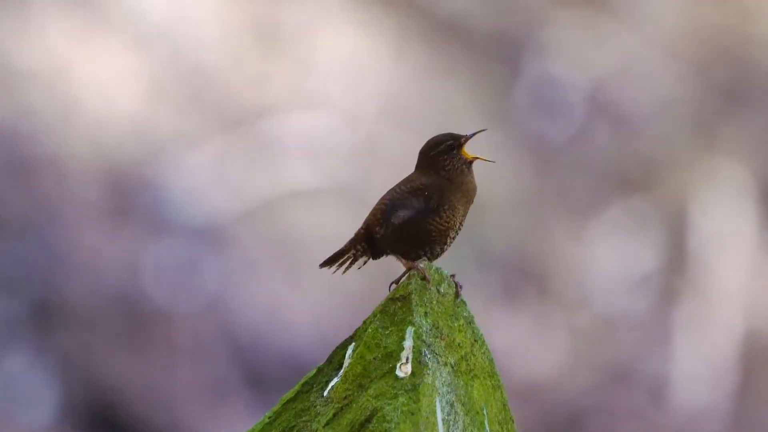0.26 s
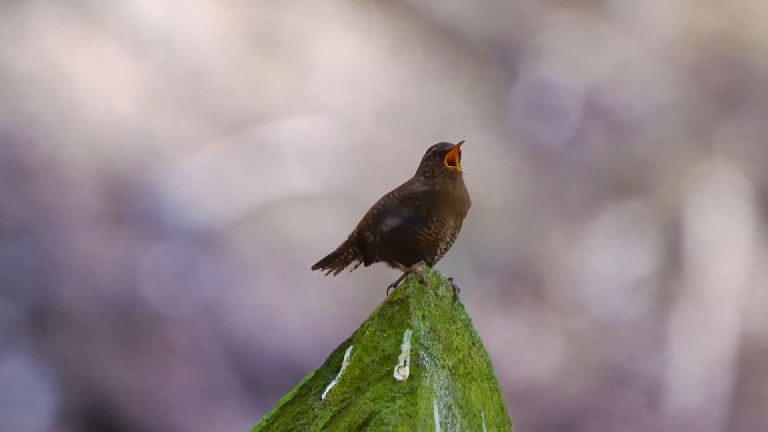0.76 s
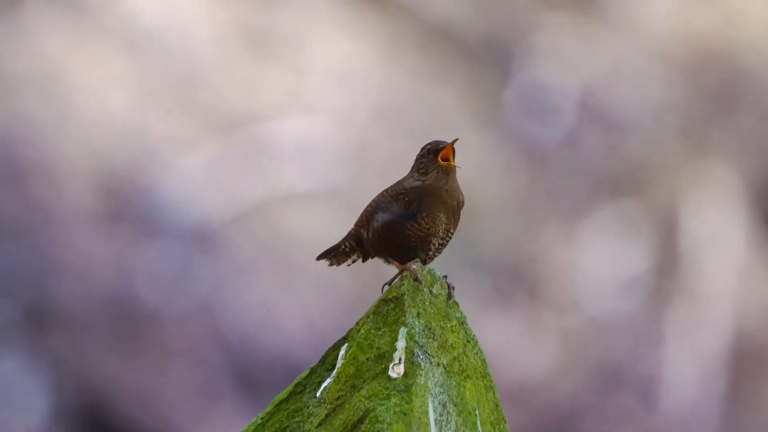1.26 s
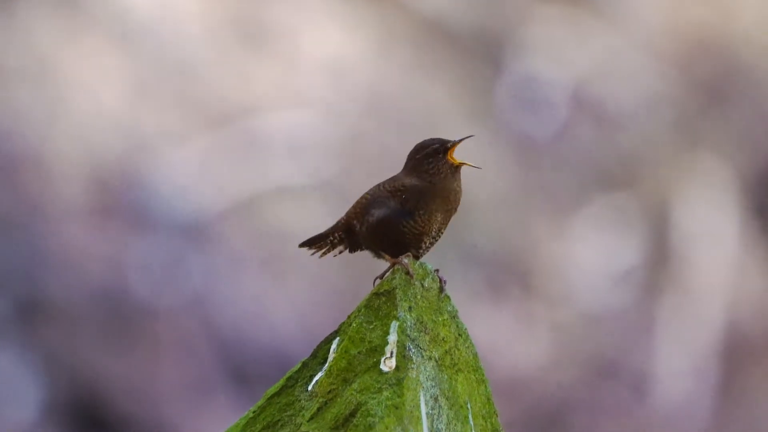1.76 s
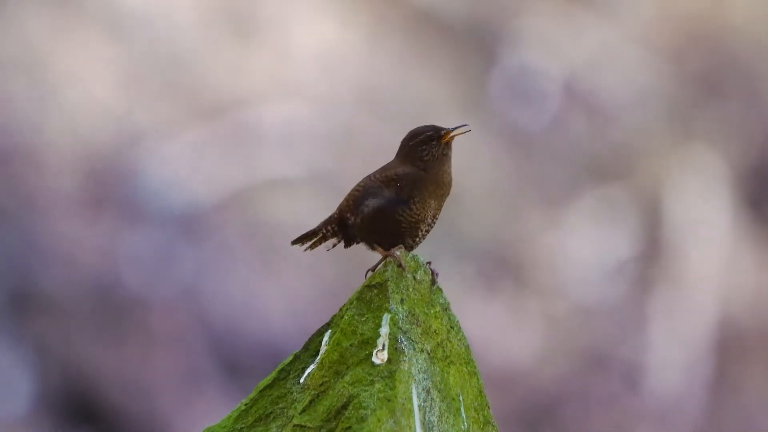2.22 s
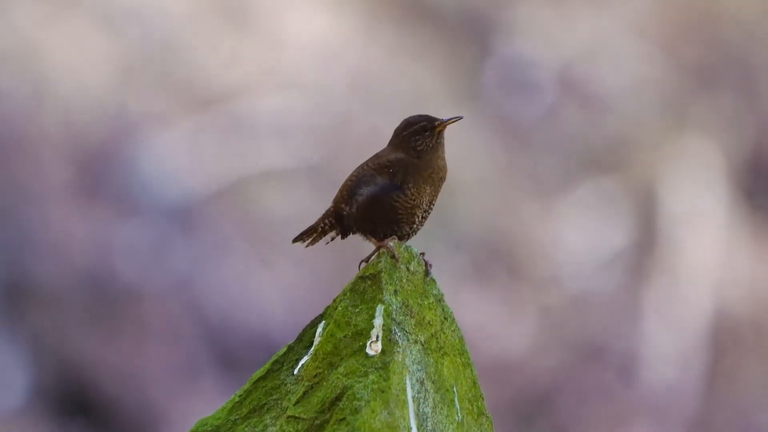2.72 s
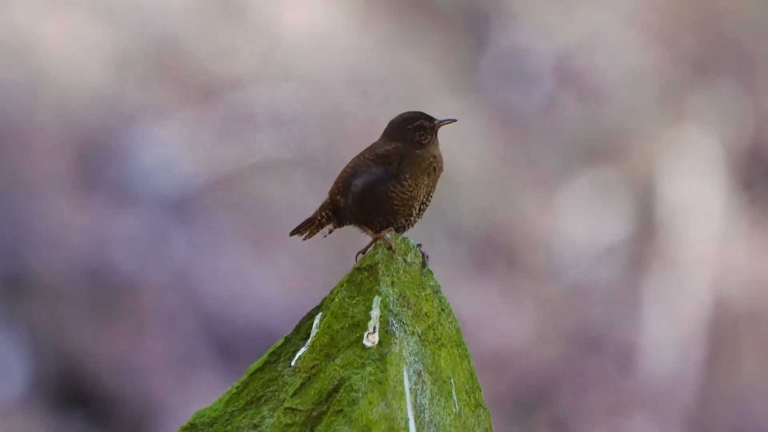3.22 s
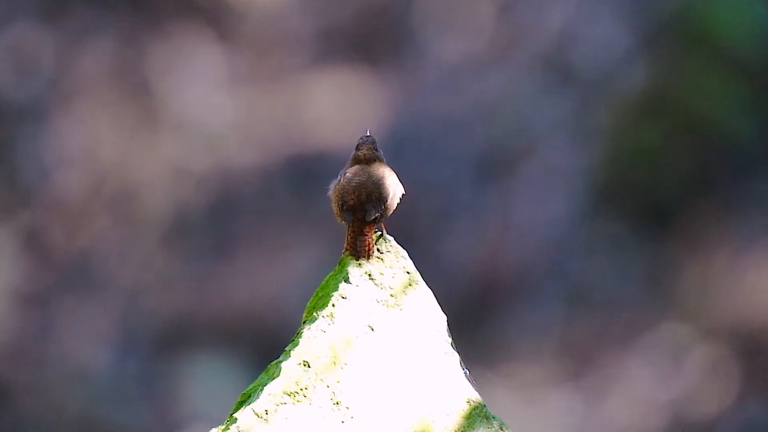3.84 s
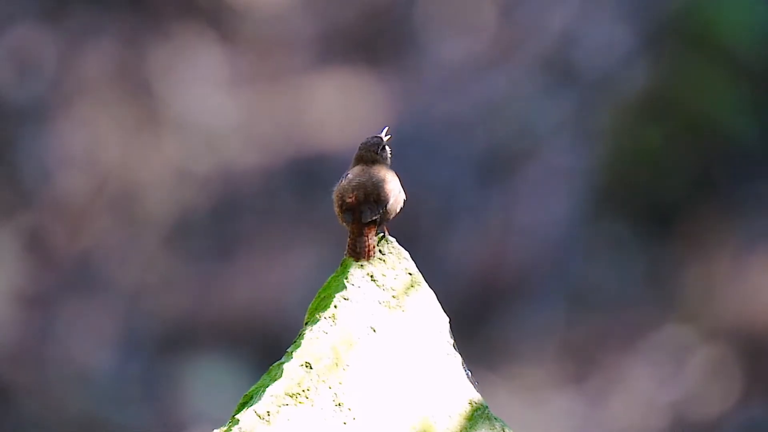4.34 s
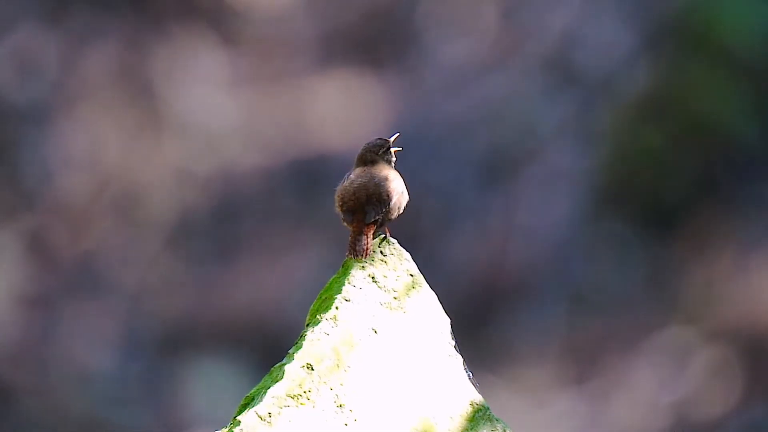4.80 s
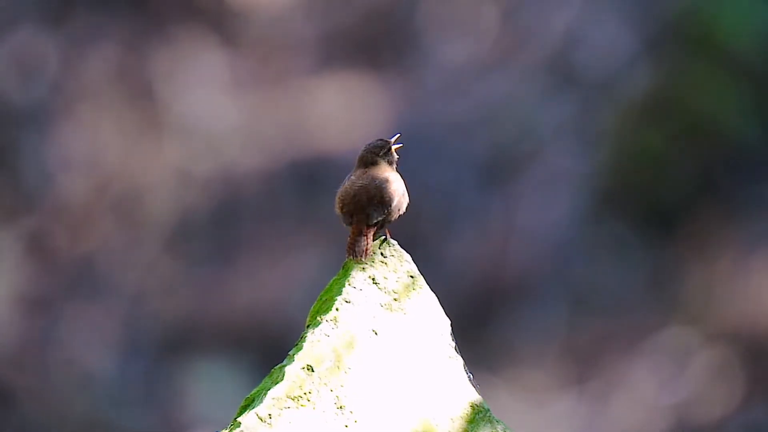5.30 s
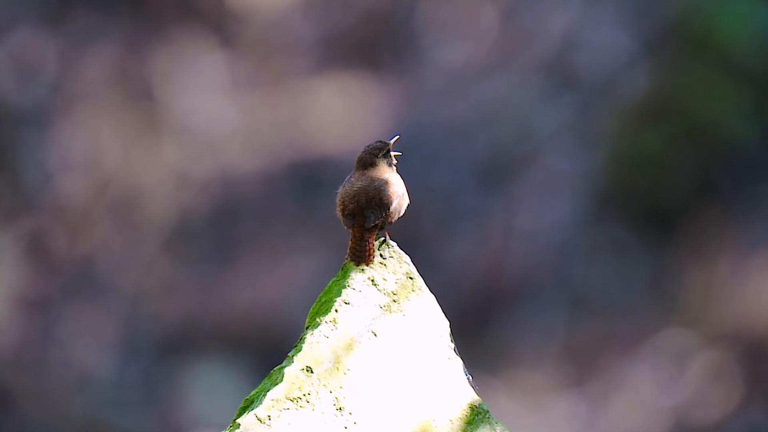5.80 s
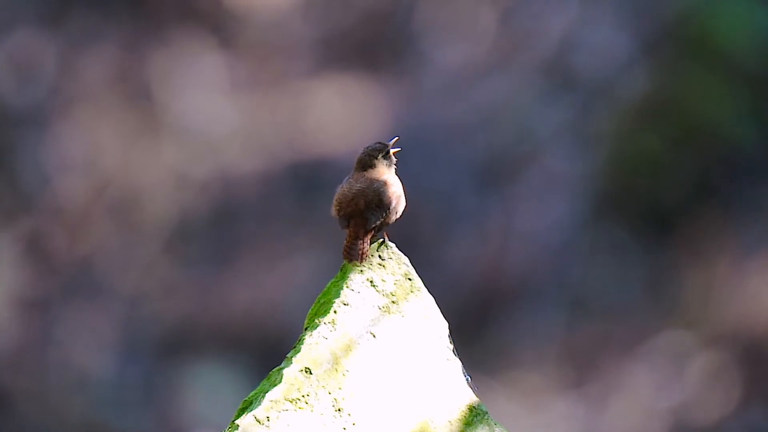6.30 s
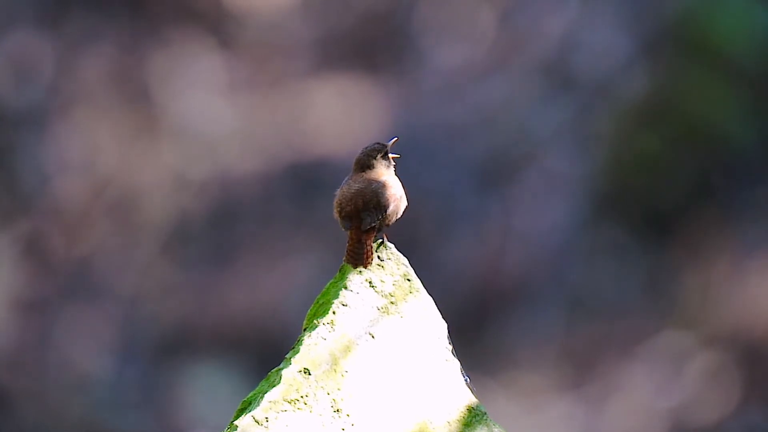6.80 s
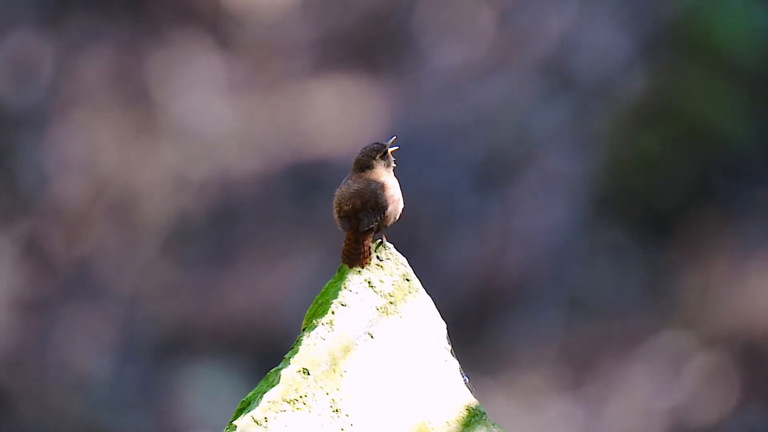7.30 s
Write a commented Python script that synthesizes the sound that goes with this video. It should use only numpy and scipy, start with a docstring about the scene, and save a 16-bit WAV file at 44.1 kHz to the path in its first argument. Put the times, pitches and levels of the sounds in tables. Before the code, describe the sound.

Outdoors by a rushing stream, a small wren sings loudly and close, its pure high whistles bending, warbling and trilling. Other wrens overlap it, one deeper in the wood and softer. Clear short echoes return from left and right. A fast chipping trill fills about a second near two seconds, then sharp swooping notes and twitters follow. The water hisses evenly throughout, with a few faint ticks.

```python
"""Three wrens by a rushing stream

Three wrens sing over each other as pure sine whistles that glide, hook, warble and trill.
One sits straight ahead; a rock face on the left and a farther one on the right throw the second's
notes back; a third, deeper in the wood, has softer echoes. The stream is shaped, partly shared noise
with almost no bass, and a few faint ticks are short smooth pulses."""
import sys
import numpy as np
from scipy import signal
from scipy.fft import rfft, irfft, next_fast_len
from scipy.io import wavfile
from scipy.ndimage import uniform_filter1d, map_coordinates

SR = 44100
rng = np.random.default_rng(int(sys.argv[2]) if len(sys.argv) > 2 else 0)


def pcm_store(signal):
    """Save signal as 16-bit PCM."""
    levels = np.round(np.clip(np.atleast_2d(signal), -1, 1) * 32767)
    wavfile.write(sys.argv[1], SR, levels.astype(np.int16).T)


N = 332955

SWELL_CURVE = 1.4  # power of the distance from a note's peak while it swells


def amp(db):
    """Gain of a level in dB."""
    return 10 ** (np.asarray(db) / 20)


def unit(x):
    """x scaled to an RMS of 1."""
    return x / np.sqrt(np.mean(x ** 2) + 1e-20)


def along(points, hz):
    """A response through (f/Hz, value) points, interpolated on a log frequency axis."""
    f, value = np.transpose(points)
    return np.interp(np.log(hz + 1), np.log(f + 1), value)


def wobble(rate):
    """A smooth random curve through rate knots a second."""
    knots = rng.standard_normal(int(N * rate / SR) + 4)
    return map_coordinates(knots, [np.arange(N) * rate / SR])


def filtered(x, response):
    """x with its spectrum multiplied by a response of frequency."""
    m = next_fast_len(N + SR // 2)
    spectrum = rfft(x, m) * response(np.fft.rfftfreq(m, 1 / SR))
    return irfft(spectrum, m)[..., :N]


def convolved(x, h):
    """x through one impulse response per side."""
    return signal.fftconvolve(np.atleast_2d(x), h, axes=1)[:, :N]


def add(track, start, sound):
    """Mix a sound into a track from sample start on."""
    first = max(start, 0)
    piece = sound[first - start:N - start]
    track[first:first + len(piece)] += piece


def tail(t60, gap):
    """Scattered reflections: two unrelated noise decays of about unit energy that begin after a gap."""
    t = np.arange(SR // 2) / SR
    h = rng.standard_normal((2, len(t))) * amp(-60 * t / t60) * (t > gap)
    return h / np.linalg.norm(h[0])


def rough_face(t60, smear_db):
    """A rough reflector returns one clear copy followed by a short smear."""
    face = amp(smear_db) * tail(t60, 0)
    face[:, 0] = 1
    return face


def whistle(rows, phase, fade=.004):
    """The syrinx makes one pure tone along (t/s, f/Hz, level/dB); returns its first sample and the sound."""
    s, hz, db = np.transpose(rows)
    t = np.arange(s[0] - fade, s[-1] + fade, 1 / SR)
    round_off = int(.003 * SR) + 1  # muscles round the corners of a glide
    pitch = uniform_filter1d(np.interp(t, s, hz), round_off, mode="nearest")
    level = uniform_filter1d(np.interp(t, s, db), round_off, mode="nearest")
    edge = np.clip(np.minimum(t - t[0], t[-1] - t) / (2 * fade), 0, 1)
    envelope = amp(level) * np.sin(edge * np.pi / 2) ** 2
    tone = np.sin(phase + 2 * np.pi * np.cumsum(pitch) / SR)
    return round(t[0] * SR), envelope * tone


def sing(notes):
    """All given notes of one bird in one track; moving air makes the level flutter."""
    out = np.zeros(N)
    for rows, phase in zip(notes, 2 * np.pi * rng.random(len(notes))):
        add(out, *whistle(rows, phase))
    return out * amp(1.5 * wobble(90))


def placed(shape, events):
    """One note per event (t/s, level/dB, f/Hz): the same shape shifted in time, pitch and level."""
    return [np.array(shape) + [s, hz, db] for s, db, hz in events]


def glides(notes, later=0):
    """Single notes: the pitch bends as a parabola through three values, the level swells and fades."""
    fade_curve = 0.96  # power of the distance from the peak
    out = []
    for start, length, first, middle, last, db, place, swell_db, fade_db in notes:
        u = np.linspace(0, 1, num=25)  # share of the note gone by
        place = np.clip(place, .01, .99)
        hz = first * (1 - u) * (1 - 2 * u) + 4 * middle * u * (1 - u) + last * u * (2 * u - 1)
        before = np.clip(1 - u / place, 0, 1)
        after = np.clip((u - place) / (1 - place), 0, 1)
        level = db - swell_db * before ** SWELL_CURVE - fade_db * after ** fade_curve
        out.append(np.transpose([later + start + length * u, hz, level]))
    return out


def arches():
    """Notes that climb to a top over a length of their own, then all plunge alike."""
    # rise to the top [share of the climb still to go, f/Hz, level/dB]
    climb_shape = [(0.99, 6880, -18), (0.4, 7350, -13)]
    # fall from the top [t from the event/s, f/Hz, level/dB]
    plunge = [(-.062, 7740, -16.5), (-.052, 7740, -18.5), (-.033, 6820, -14), (0, 5370, -1.5),
              (.014, 4730, -16)]
    # arched notes [t/s, level/dB, climb length/s]
    arch_events = [(2.472, -5.5, .014), (2.695, -5, 0.093), (2.925, -5, .096), (3.153, -5.5, 0.088)]
    top = plunge[0][0]
    out = []
    for s, db, length in arch_events:
        climb = [(top - left * length, hz, level) for left, hz, level in climb_shape]
        out.append(np.array([*climb, *plunge]) + [s, 0, db])
    return out


def shoulders():
    """Notes that hold their pitch, then roll off down as much of one slope as they last."""
    # held notes [t of the bend/s, peak level/dB, held f/Hz, hold/s, fall/s]
    held = [(1.811, -10, 5896, 0.024, 0.064), (5.292, -6.5, 5790, 0.025, 0.049),
            (5.937, -9.5, 5810, .048, 0.032)]
    roll_hz, roll_s = 1510, .06  # depth and length of the whole slope
    peak_s, swell_db, fade_db_per_s = .014, 14, 160  # loudest just after the bend
    out = []
    for bend, db, hz, hold, fall in held:
        t = np.linspace(-hold, fall, num=25)
        pitch = hz - roll_hz * np.sin(np.pi / 2 * np.clip(t / roll_s, 0, 1)) ** 2
        early = np.clip((peak_s - t) / (peak_s + hold), 0, 1)
        level = db - swell_db * early ** SWELL_CURVE - fade_db_per_s * np.clip(t - peak_s, 0, 1)
        out.append(np.transpose([bend + t, pitch, level]))
    return out


def stream(patchy_db=1.1):
    """Rushing water: noise partly shared by both sides, with faint patches in time and pitch."""
    # colour of the water, relative [f/Hz, level per Hz/dB]
    colour = [(180, -106), (300, -62), (580, -58), (756, -48), (877, -48), (968, -42), (1240, -38.5),
              (2000, -18), (3510, -5.5), (4200, 0), (4880, -1), (8410, -6), (11500, -12.5), (15500, -21.5)]
    # likeness of left and right [f/Hz, correlation]
    alike = [(600, 0.68), (1500, 1), (3000, 0.74), (6000, 0.13), (12000, 0.18)]
    # balance of the sides [f/Hz, left minus right level/dB]
    lean = [(500, 2), (1500, 0.5), (8000, -0.5), (12000, -2)]
    z = signal.stft(rng.standard_normal((2, N)), nperseg=512)[2]
    field = uniform_filter1d(uniform_filter1d(rng.standard_normal(z.shape[1:]), 6, 0), 10, 1)
    pair = signal.istft(z * amp(patchy_db * unit(field)), nperseg=512)[1][:, :N]

    def mid_side(hz):
        turn = np.arccos(np.clip(along(alike, hz), -1, 1)) / 2  # shares power between mid and side
        return amp(along(colour, hz)) * [np.cos(turn), np.sin(turn)]

    mid, side = filtered(pair, mid_side)
    both = filtered(np.array([mid + side, mid - side]),
                    lambda hz: amp(np.outer([.5, -.5], along(lean, hz))))
    return amp(-27) * unit(both)  # RMS over both sides, dB


def ticks():
    """Single dull clicks: smooth pulses of a few samples, a little louder on the left."""
    # clicks [t/s, level before the lift/dB]
    clicks = [(.083, -37.5), (1.917, -41), (2.699, -46), (3.218, -48), (3.471, -46), (3.712, -60),
              (4.648, -35.5), (6.013, -42.5), (7.379, -30.5)]
    lift_db = 12
    out = np.zeros(N)
    for s, db in clicks:
        add(out, round(s * SR), amp(db + lift_db) * np.hanning(9))
    return out * amp([[1.2], [-1.2]])


def back_wren():
    """Ahead but deeper in the wood: two softer, blurred echoes and a tail."""
    # single notes [t/s, length/s, first f/Hz, middle f/Hz, last f/Hz, peak level/dB,
    # place of peak 0-1, swell/dB, fade/dB]
    notes = [ (.58, .025, 7750, 7675, 7600, -30, 1, 1, 0),
             (.632, .073, 7300, 7160, 7130, -18.5, 0.041, 0, 13),
             (1.315, 0.08, 5750, 5650, 5800, -19, .47, 12, 11),
             (5.285, 0.028, 4150, 4200, 4130, -23.5, 0, 0, 8),
             (5.9, 0.015, 5420, 5300, 5400, -16, 0.45, 7, 7),
             (6.488, 0.052, 5300, 4960, 4910, -12, 0.54, 4, 6),
             (6.574, .05, 4910, 4020, 3260, -13.5, 0.48, 19, 14),
             (6.675, 0.053, 3400, 3830, 4280, -13, 0.96, 18, 16),
             (6.684, 0.07, 5680, 5620, 5890, -20.5, 0.57, 5, 6),
             (6.752, 0.041, 4330, 3620, 3300, -12, 0.017, 3, 20),
             (6.842, 0.053, 3200, 3724, 4250, -15.5, 1, 12, 0),
             (6.921, 0.031, 4220, 3570, 3190, -15, 0, -6, 12)]
    # down-and-up warble [t from lowest point/s, f above lowest/Hz, level/dB]
    vee = [(-.022, 691, -14), (-.01, 332, -2.5), (0, 1, -5), (.012, 476, -2), (0.025, 954, -9.5)]
    # shapes of a pip and a dipping note [t from the event/s, f from its pitch/Hz, level/dB]
    pip = [(-.01, 150, -6.5), (0, 6, 0.5), (.009, -320, -15)]
    dip = [(-.068, 420, -11), (-.02, 199, -2), (0, 0, -2), (.023, 230, -1.5)]
    # when each shape is sung [t/s, level/dB, f/Hz]
    vees = [(5.989, -18, 5340), (6.075, -16, 5400), (6.156, -16.5, 5220), (6.24, -14.5, 5220),
            (6.326, -14, 5160), (6.41, -18, 5420)]
    pips = [(5.714, -10.5, 4500), (5.775, -14.5, 4350), (5.834, -14, 4220)]
    dips = [(.21, -18.5, 7000), (.36, -20.5, 7060), (.52, -20.5, 7080)]
    # echoes [delay/s, left level/dB, right level/dB]
    echoes = [(.091, -10, -15), (.146, -18, -12.5)]
    song = sing([*glides(notes), *placed(vee, vees), *placed(pip, pips), *placed(dip, dips)])
    out = song + amp(-6) * convolved(song, tail(0.61, .005))
    for delay, *sides_db in echoes:
        late = np.pad(song, (round(delay * SR), 0))
        out += amp(sides_db)[:, None] * convolved(late, rough_face(0.03, 0))
    return out


def rock_wren():
    """Among the rocks: close leaves blur the song, each rough face returns a clear copy and a smear."""
    # single notes, then a refrain sung twice [t/s, length/s, first f/Hz, middle f/Hz, last f/Hz,
    # peak level/dB, place of peak 0-1, swell/dB, fade/dB]
    notes = [ (.001, .055, 7120, 7280, 7220, -22, 0.12, -6.5, 5),
             (.006, 0.0394, 5750, 5230, 4910, -9, 0.47, 7.5, 7),
             (.031, 0.055, 4300, 4254, 4085, -10.5, 0.49, 9, 3.5),
             (.088, 0.015, 4370, 4130, 3900, -16, 0, -6, 5),
             (1.176, 0.1, 4020, 4610, 5870, -13.5, 0.41, 16, 2.5),
             (1.332, 0.046, 6000, 4520, 3920, -15.5, 0.58, 1, 4.5),
             (1.49, 0.098, 7130, 7080, 6990, -23.5, 0.98, 6, 3),
             (1.64, 0.11, 7520, 7180, 7200, -19.5, .4, 2, 3),
             (3.238, 0.066, 4350, 4400, 4400, -11, 0.75, 3, 3),
             (3.31, 0.024, 4330, 4360, 4340, -21.5, 1, 1, 0),
             (3.352, 0.065, 6410, 6500, 5940, -10.5, 0.45, 13, 2),
             (3.49, 0.022, 4850, 4370, 4140, -16.5, .42, 11.5, 2),
             (3.7, 0.048, 6680, 4750, 3970, -10.5, 0.31, 10.5, 8),
             (3.814, 0.11, 6650, 6440, 6650, -13, 0.62, 6.5, 4),
             (3.998, 0.096, 8000, 7790, 7800, -17.5, 0.56, 11, 3),
             (4.128, 0.083, 6680, 6080, 6200, -15, 0.49, 2.5, 15),
             (4.22, .041, 6600, 4910, 4820, -13.5, 0.38, 2, 1.5),
             (4.852, 0.087, 4326, 4228, 4074, -10.5, 0.72, 9.5, 15),
             (5.003, .03, 8970, 8060, 7670, -24, 1, 9, 0),
             (5.03, 0.18, 7720, 7910, 8060, -20.5, 0.19, -1, 0.5),
             (5.409, 0.039, 3880, 3780, 3700, -20, 0, 0, 8),
             (5.496, 0.062, 5616, 5310, 4320, -9, .16, 11, 3),
             (5.595, 0.075, 5480, 5374, 5200, -9, 0.56, 22, 2.5),
             (6.026, .039, 3750, 3757, 3530, -22.5, .4, 8, 8),
             (6.147, 0.17, 7620, 7305, 7190, -15, 0.3, 12, 8.5),
             (6.34, 0.038, 5650, 5200, 4650, -6, 0.52, 10.5, 23),
             (6.39, .016, 4470, 4215, 4000, -17, 0, 0, 2), (6.434, 0.023, 4320, 4110, 4050, -16, .4, 2, 7),
             (7.03, 0.13, 7200, 6380, 6320, -17, 0.89, 8, 4),
             (7.512, .038, 7515, 6500, 5460, -14.5, 1, 16, -17)]
    refrain = [ (.685, .081, 5540, 5134, 4610, -6.5, 0.34, 16, 11.2),
               (.805, .023, 4360, 4215, 4100, -14, 0.095, 9, 10.5),
               (.851, 0.017, 4380, 4160, 3910, -12.5, .45, 12, 10),
               (.925, 0.1, 7470, 7620, 7560, -16, 0.86, 9, 9),
               (1.058, 0.046, 6080, 4570, 3850, -11, 0.47, 5, 8)]
    refrain_again_s = 6.352
    # down-and-up warble [t from lowest point/s, f above lowest/Hz, level/dB]
    vee = [(-.022, 691, -14), (-.01, 332, -2.5), (0, 1, -5), (.012, 476, -2), (0.025, 954, -9.5)]
    # shapes of a scoop, upturn, flick and slide [t from the event/s, f from its pitch/Hz, level/dB]
    scoop = [(-.049, -130, -8), (-.02, -150, -1), (0, 0, 0), (.015, 402, -2), (.048, 1690, -2),
             (.056, 1750, -16)]
    upturn = [(-.058, -80, -3.5), (-.03, -92, -1), (0, 5, 0), (.012, 320, -1)]
    flick = [(-.016, -640, -14.5), (0, 0, -1.5), (.01, 230, -10)]
    slide = [(-.046, 1402, -10), (-.038, 780, -7), (-.03, 660, -8), (-.023, 500, -16), (-.014, 220, -7.5),
             (0, -5, 0.5), (.016, -20, -5.5)]
    # when each shape is sung [t/s, level/dB, f/Hz]
    vees = [(.278, -12.5, 6220), (.358, -14, 6240), (.44, -11, 6300), (.522, -11.5, 6310),
            (.608, -11.5, 6310), (6.627, -12.5, 6180), (6.711, -13.5, 6240), (6.794, -13, 6270),
            (6.876, -11.5, 6300), (6.961, -10.5, 6260)]
    scoops = [(3.605, -9.5, 4520)]
    upturns = [(.203, -14, 6190), (6.555, -15, 6180)]
    flicks = [(4.316, -10, 5480), (4.449, -9, 5340), (4.582, -6, 5490), (4.717, -6, 5350)]
    slides = [(4.378, -15.5, 6120), (4.516, -13.5, 6120), (4.646, -13.5, 6120), (4.776, -12, 6080)]
    # slowly drifting echo paths [t/s, left rock delay/s, right rock delay/s]
    echo_paths = [(0, 0.066, .097), (0.697, 0.08, 0.11), (1.4, 0.083, 0.12), (2.5, 0.084, 0.13),
                  (3.2, 0.085, 0.13), (4.4, 0.081, 0.13), (4.8, .08, .129), (5.4, 0.08, 0.13),
                  (6.4, 0.073, 0.12), (7.55, 0.077, 0.12)]
    # balance of each rock's echo, left rock first [left level/dB, right level/dB]
    thrown_db = [(-1.5, -46), (-44, -2.5)]
    echo_trim_db = -4.5  # on top of that balance
    lag = 1.0  # samples by which the song reaches the left side first
    song = sing([*glides(notes), *glides(refrain), *glides(refrain, refrain_again_s), *arches(),
                 *placed(vee, vees), *shoulders(), *placed(scoop, scoops), *placed(upturn, upturns),
                 *placed(flick, flicks), *placed(slide, slides)])
    sides = amp([[.5], [-.5]])
    out = filtered(song, lambda hz: sides * np.exp(np.outer([1, -1], 1j * np.pi * hz * lag / SR)))
    out += amp(-9.0) * convolved(song, tail(0.12, 0.0021))
    out += amp(-8.5) * convolved(song, tail(0.83, 0.0084))
    s, *delays = np.transpose(echo_paths)
    now = np.arange(N)
    for delay, sides_db in zip(delays, thrown_db):
        late = map_coordinates(song, [now - SR * np.interp(now / SR, s, delay)])
        fluttering = late * amp(1.93 * wobble(40))
        gain = amp(np.array(sides_db)[:, None] + echo_trim_db)
        out += gain * convolved(fluttering, rough_face(0.049, -3.5))
    return out


def trill_chips():
    """Fast trills of one chip; the pitch sags as a trill goes on and scatters from chip to chip."""
    # one chip [t/s, f from centre/Hz, level/dB]
    chip = [(-.004, -300, -9), (.002, -49, 0), (.007, 48, -3.5), (0.011, 100, -4.5), (.015, 40, -24)]
    # two trills, each a list of chips [t/s, level/dB]
    trills = [
        [(1.907, -13.5), (1.938, -16), (1.974, -17), (2.0567, -7.5), (2.0932, -5.5), (2.1287, -5.5),
         (2.164, -5.5), (2.198, -8), (2.233, -9), (2.269, -7), (2.3023, -6), (2.336, -7), (2.374, -10),
         (2.4089, -10), (2.4443, -6), (2.478, -5), (2.5134, -7), (2.55, -9), (2.586, -6.5), (2.6217, -7),
         (2.6594, -4.5), (2.6952, -5.5), (2.732, -7), (2.7696, -8), (2.8087, -5), (2.846, -8)],
        [(7.4247, -8), (7.4583, -8), (7.4945, -7.5), (7.5303, -8)],
    ]
    start_hz, sag_hz_per_s, scatter_hz = 4448, 205, 30
    chips = []
    for trill in trills:
        for s, db in trill:
            centre = start_hz - sag_hz_per_s * (s - trill[0][0])
            chips.append((s, db, centre + scatter_hz * rng.standard_normal()))
    return placed(chip, chips)


def front_wren():
    """Straight ahead; the wood's tail comes mostly from there too, and takes up less of the low trill."""
    # single notes [t/s, length/s, first f/Hz, middle f/Hz, last f/Hz, peak level/dB,
    # place of peak 0-1, swell/dB, fade/dB]
    single = [ (1.929, 0.091, 6230, 5386, 4275, -3.5, 0.86, 16.5, 0.5),
              (2.926, 0.079, 7580, 5780, 4800, -4, 0.95, 8.5, 17),
              (3.04, 0.083, 6300, 6970, 7530, -8.5, 0.75, 8, 5),
              (3.162, 0.072, 7500, 5630, 4570, -3.5, 0.76, 22, 8.5),
              (3.424, 0.055, 6790, 5450, 4800, -4, 0.86, 14.5, 8),
              (3.654, 0.058, 6924, 5580, 4780, -6.5, 0.64, 26, -0.5),
              (7.298, 0.087, 6210, 5377, 4280, -3, 0.74, 16, 4),
              (7.39, 0.046, 4450, 3925, 3530, -12, .3, 0, 11.5)]
    # shapes of a hook and a stair [t from the event/s, f from its pitch/Hz, level/dB]
    hook = [(-.058, 780, -19), (-.034, 801, -12.5), (-.018, 450, -7.5), (0, 4, 0), (.016, 34, -14)]
    stair = [(-.072, -850, -8), (-.057, -620, -2.5), (-.018, -370, -4), (0, -1, 0), (.013, 180, -14)]
    # when each shape is sung [t/s, level/dB, f/Hz]
    hooks = [(1.504, -10.5, 7480), (1.621, -9, 7770), (1.743, -9, 7810), (1.86, -13, 7900),
             (6.865, -11.5, 7520), (6.986, -9.5, 7770), (7.109, -10, 7830), (7.226, -12.5, 7880)]
    stairs = [(3.351, -12.5, 7230), (3.592, -10, 7250)]
    notes = sing([*glides(single), *placed(hook, hooks), *placed(stair, stairs)])
    trill = sing(trill_chips())
    centre, other = amp(-9) * tail(0.36, .015)
    spread = amp(-8) * other
    wood = np.array([centre + spread, centre - spread])
    return notes + trill + convolved(notes + amp(-2.5) * trill, wood)


def scene():
    """The stream and ticks behind the three birds."""
    return stream() + ticks() + back_wren() + rock_wren() + front_wren()


def record(dry):
    """Peaks beyond full scale clip; a steep cut then removes everything from 15640 Hz up."""
    return filtered(np.clip(dry, -1, 1), lambda hz: hz < 15640)


dry = scene()
out = record(dry)
pcm_store(out)
```